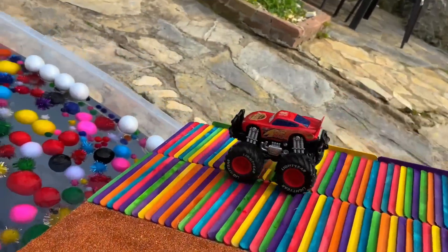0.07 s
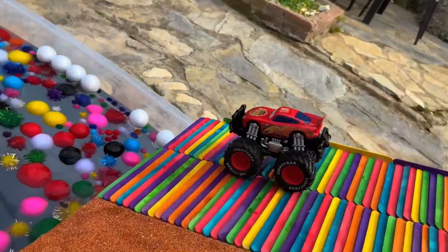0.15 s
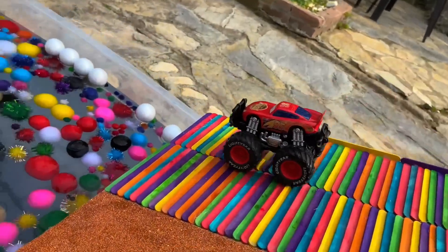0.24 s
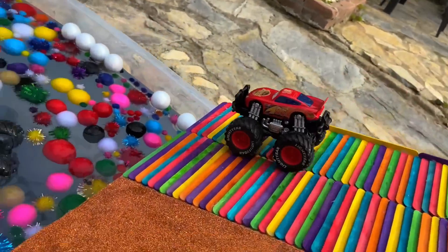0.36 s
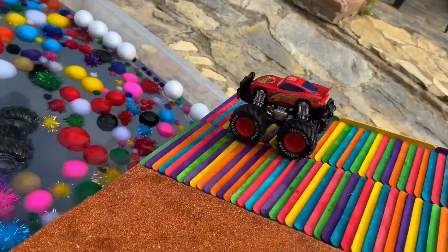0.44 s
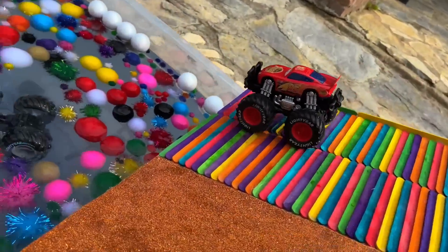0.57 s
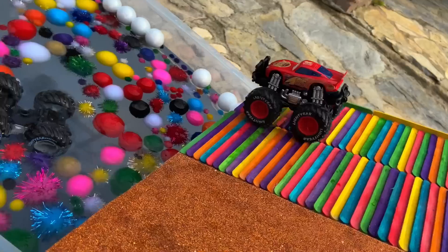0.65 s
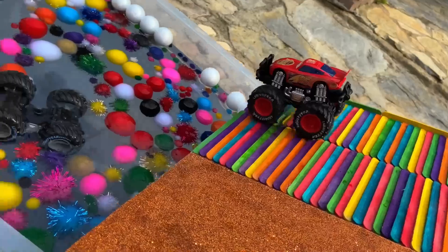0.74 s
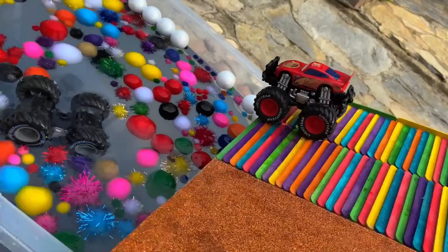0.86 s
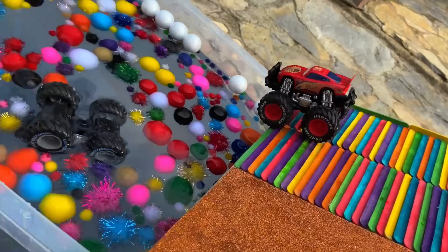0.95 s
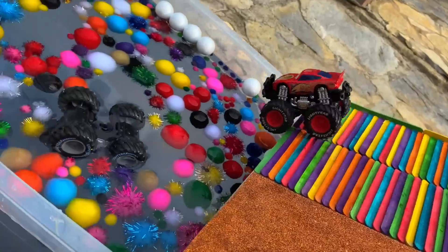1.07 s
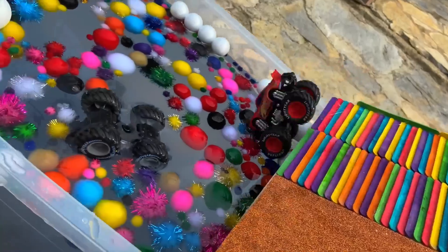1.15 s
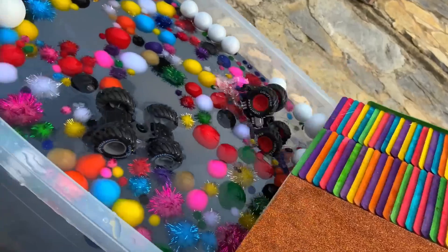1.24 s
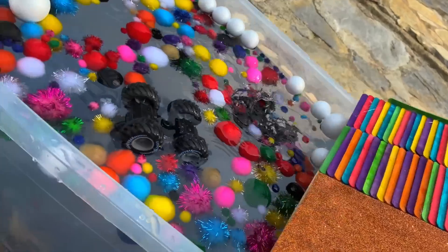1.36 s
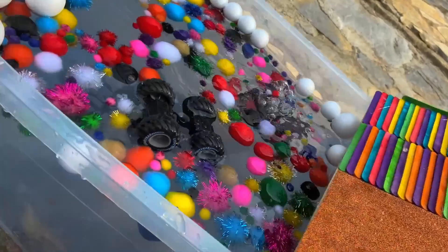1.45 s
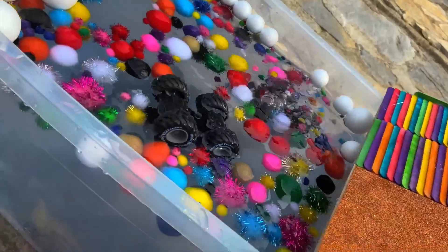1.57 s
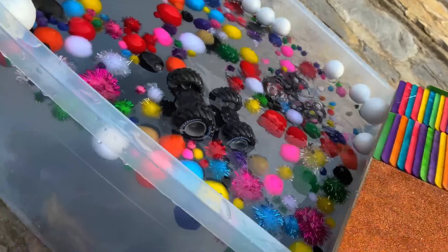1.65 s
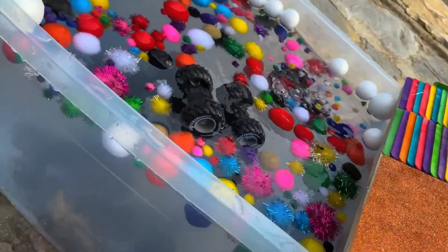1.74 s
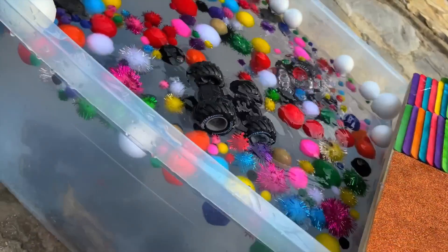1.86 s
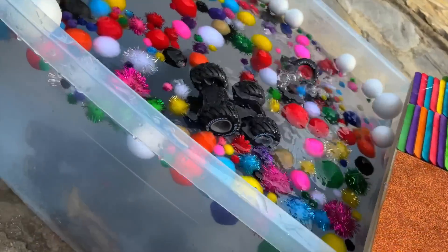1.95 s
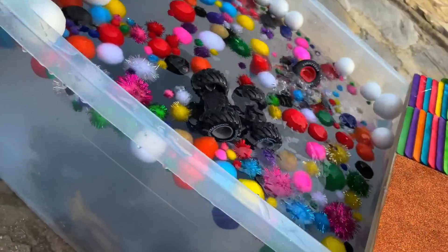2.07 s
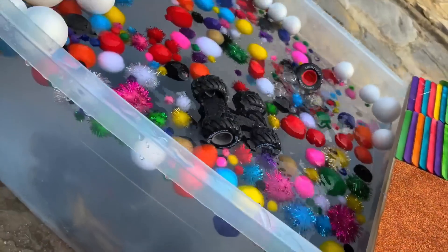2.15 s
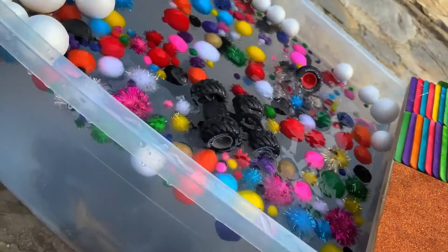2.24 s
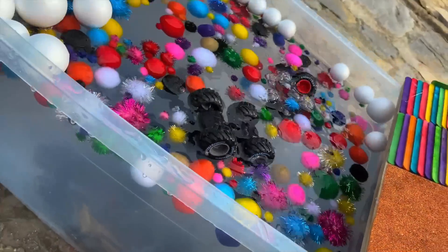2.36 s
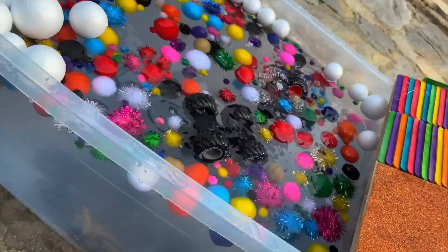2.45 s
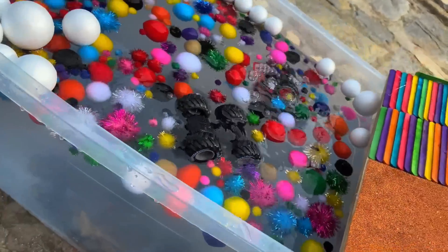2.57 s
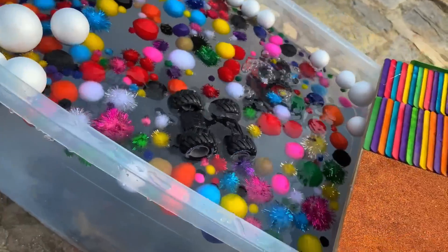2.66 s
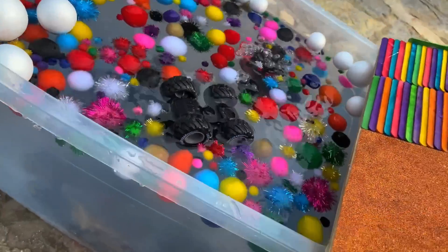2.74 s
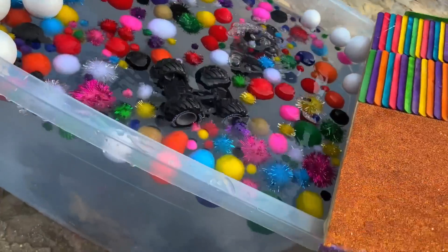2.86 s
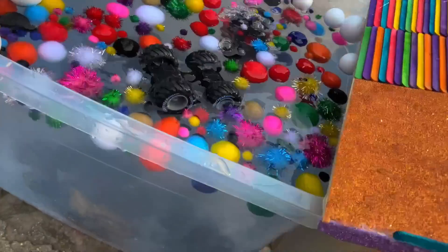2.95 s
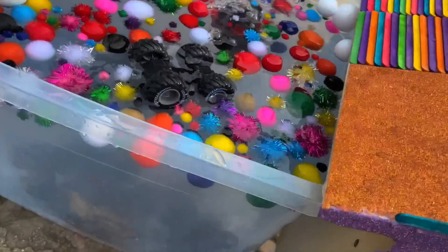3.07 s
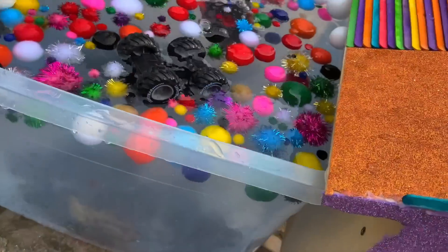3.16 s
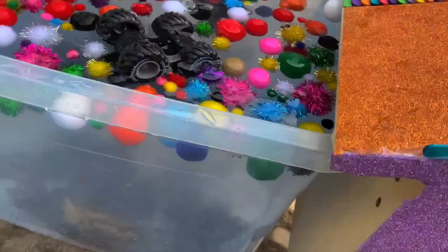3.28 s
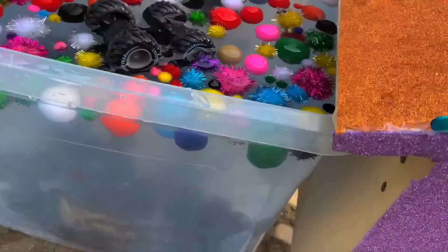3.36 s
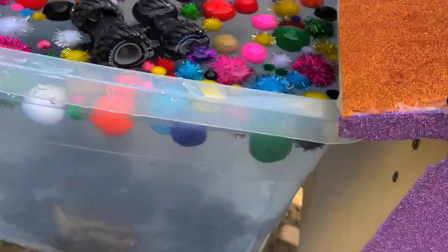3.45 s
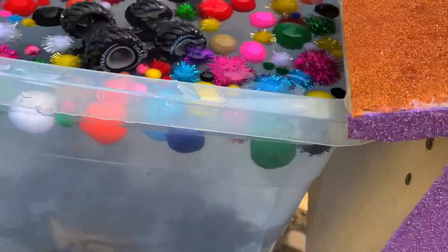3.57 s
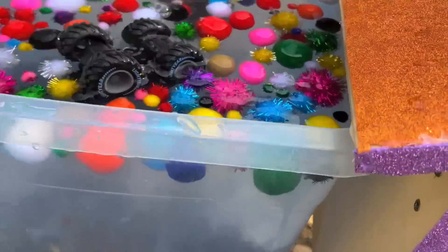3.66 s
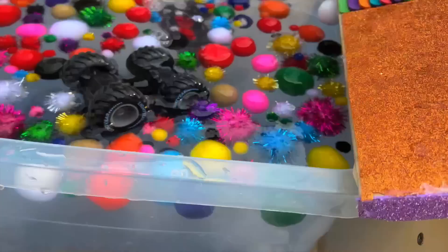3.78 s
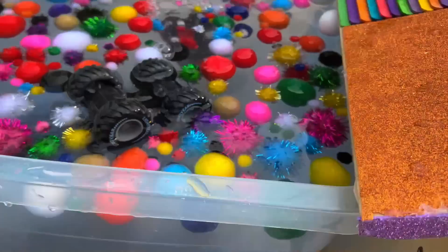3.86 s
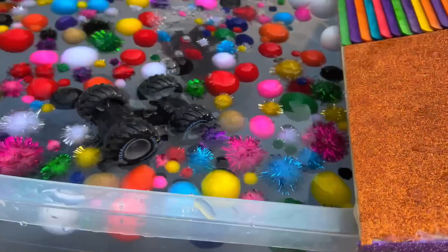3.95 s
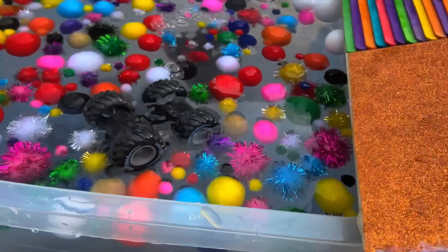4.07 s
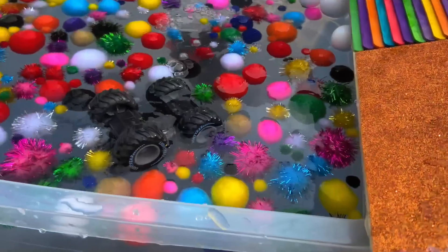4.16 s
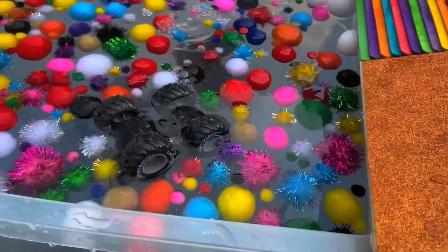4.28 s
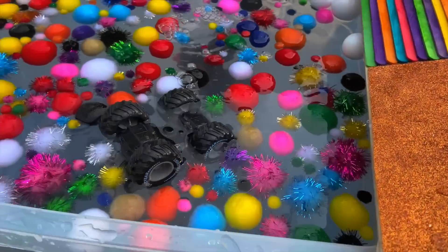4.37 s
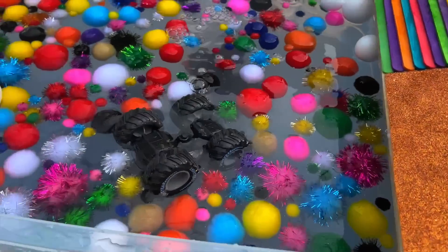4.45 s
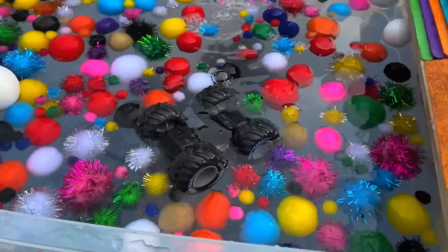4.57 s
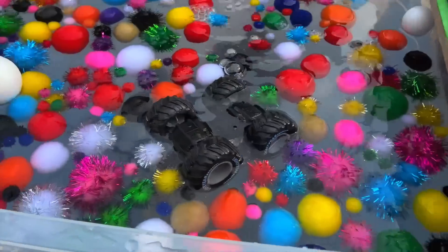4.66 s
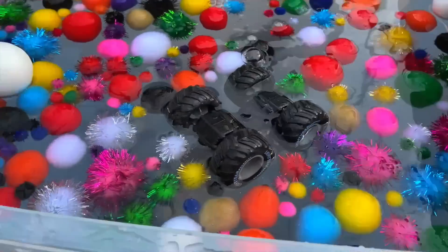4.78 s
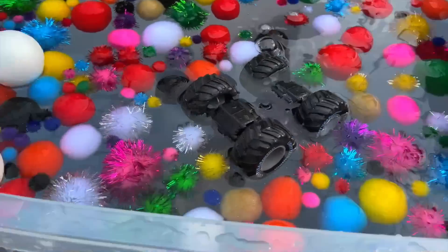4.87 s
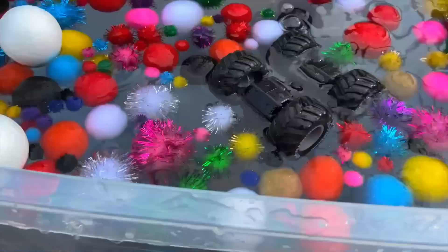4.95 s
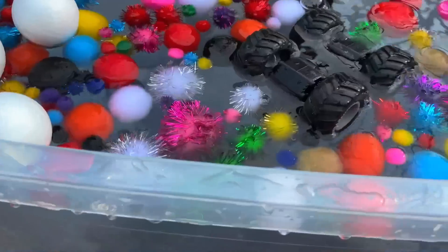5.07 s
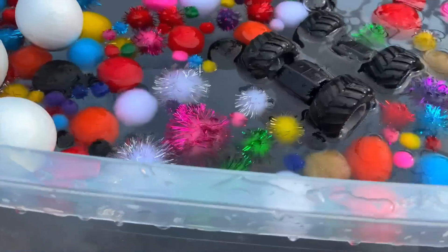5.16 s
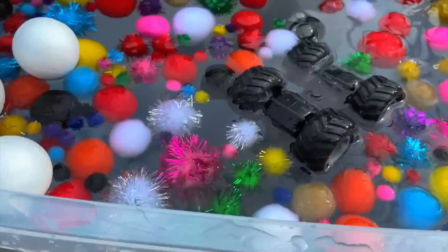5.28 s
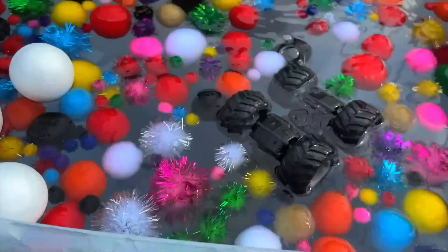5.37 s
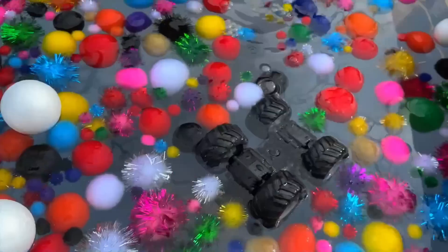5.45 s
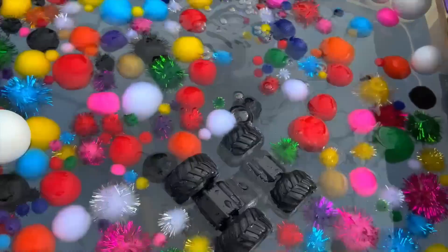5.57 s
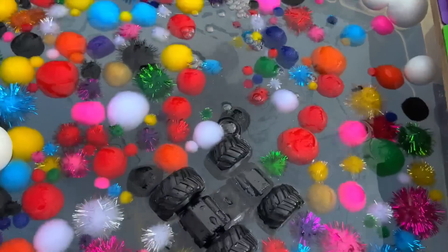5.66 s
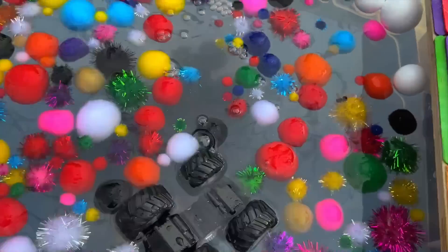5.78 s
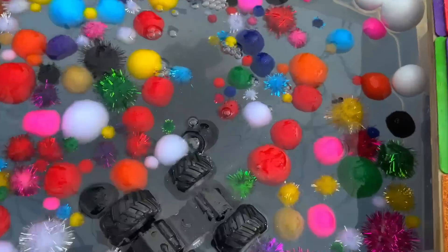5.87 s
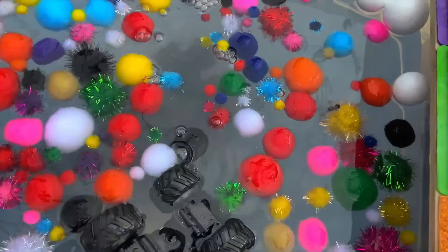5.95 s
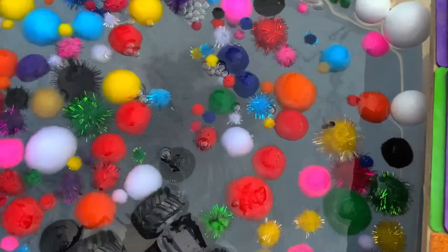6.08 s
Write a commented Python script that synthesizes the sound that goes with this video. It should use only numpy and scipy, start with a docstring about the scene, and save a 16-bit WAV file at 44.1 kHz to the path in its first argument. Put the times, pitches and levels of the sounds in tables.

```python
"""Toy truck, tub of water and hollow box

A toy truck rattles along a ribbed ramp: jolts excite resonances of the loose parts and the ramp.
It tips into a tub: gliding, decaying sines make the bubbles, shaped noise the thrown water and smacks.
Small bubbles keep rising; then soles shift on gritty paving, as filtered random impulses and noise.
The hollow box under the ramp, a sum of damped modes, is nudged, dragged and knocked.
Two ports of a hand-held phone listen close by, amid faint outdoor noise."""
import sys
import numpy as np
from scipy import signal
from scipy.fft import rfft, irfft, next_fast_len
from scipy.io import wavfile
from scipy.ndimage import uniform_filter1d

SR = 44100
rng = np.random.default_rng(int(sys.argv[2]) if len(sys.argv) > 2 else 0)


def output_pcm(signal):
    """Save a mono or channel-first signal as 16-bit PCM at the path in sys.argv[1].

    Samples are clipped to [-1, 1] before scaling.
    """
    pcm = np.clip(np.atleast_2d(signal).T, -1, 1) * 32767
    wavfile.write(sys.argv[1], SR, np.round(pcm).astype(np.int16))


N = 269892

# wheels on the ribs: [t/s, ramp bass level/dB, ramp boom level/dB, low rattle level/dB, high rattle level/dB]
ROLL = [(0.0, -43.5, -37.5, -49, -56), (0.038, -46.5, -57, -60, -62.5), (0.14, -72, -54.5, -60, -66.5),
        (0.176, -51, -60, -55.5, -56), (0.192, -57, -52, -71, -76), (0.21, -63, -56.5, -60, -63),
        (0.268, -55, -55.5, -57, -62), (0.446, -52.5, -57, -57.5, -59), (0.498, -50, -65, -61.5, -71),
        (0.522, -58, -58.5, -63, -62.5), (0.594, -56, -54.5, -59.5, -65.5), (0.7, -55, -55.5, -61, -61.5),
        (0.71, -50, -64, -70, -63), (0.75, -63, -63, -63, -63.5), (0.768, -71, -57, -72, -83),
        (0.784, -68, -57, -58, -54), (0.832, -54, -59, -65, -62), (0.916, -66, -64, -63.5, -60),
        (0.948, -59, -72, -59, -66), (0.982, -63, -48, -60.5, -58.5), (1.072, -64, -72, -62.5, -68.5),
        (1.1, -52, -63, -75, -88)]
# resonances of the ramp: [f/Hz, width/Hz, level/dB]
RAMP_MODES = [(127.4, 13.4, 0.5), (175, 15.4, 1.5), (246, 33, -8.5), (286, 20, -3.5), (356, 52, -31)]
# resonances of the truck's loose parts, lower and upper: [f/Hz, width/Hz, level/dB]
TRUCK_LOW_MODES = [(676, 135, -4.5), (1060, 91, -3.5), (1450, 140, -2.5), (1745, 51, -4)]
TRUCK_TOP_MODES = [(2120, 150, -2.5), (2620, 150, 1), (2980, 100, -7), (3330, 270, -1.5), (3780, 270, -3.5),
                   (4400, 260, -17), (6100, 2700, -15.5)]
# axle whirr, a narrow ring that shifts as the truck rolls: [t/s, f/Hz, level/dB]
WHIRR = [(0, 2920, -65), (.25, 2860, -71), (.36, 2830, -67), (.43, 2730, -65), (.55, 2860, -62.5),
         (.62, 2800, -67), (.69, 2780, -61), (.79, 2730, -64), (.84, 2650, -66), (.9, 2590, -67),
         (1.0, 2660, -57), (1.08, 2770, -65.5), (1.1, 2720, -77)]
# harder bumps that thump the ramp: [t/s, level/dB, f/Hz]
BUMPS = [(0.009, -36, 314), (0.112, -54, 139), (0.177, -45.5, 284), (0.277, -49, 129), (0.339, -52, 102),
         (0.382, -55, 164), (0.418, -53, 129), (0.448, -39, 137), (0.513, -47, 172), (0.569, -42, 103),
         (0.644, -47, 295), (0.68, -40.5, 170), (0.829, -42, 135), (0.972, -40.5, 154), (0.998, -43, 180),
         (1.04, -53, 153)]
# spectrum of the outdoor noise: [f/Hz, relative level/dB]
YARD = [(100, -1.5), (242, -4), (607, -4.5), (1070, -23), (1400, -14), (3000, -18), (7000, -22),
        (10000, -23), (13200, -20.5), (16000, -32.5)]
# deep outdoor bass: [t/s, level/dB]
YARD_BASS = [(0, -68), (.6, -55.5), (1.3, -59.5), (1.6, -66.5), (2.69, -68), (2.96, -62), (3.36, -66.5),
             (3.72, -58), (4.07, -69), (4.53, -69), (4.75, -55), (4.95, -61.5), (5.28, -50.5), (5.69, -62),
             (6.12, -59)]
# two faint narrow tones that waver in the distance: [f/Hz, width/Hz, level/dB]
DRONE = [(611.5, 36, -87), (1030, 43, -83)]
# large bubbles: [t/s, f/Hz, level/dB, t60/s, pitch rise over t60/octave]
GULPS = [(1.116, 780, -44, 0.023, 0), (1.120, 880, -23.5, 0.0094, -0.4), (1.126, 2600, -26.5, 0.0081, 0.13),
         (1.119, 290, -31.5, 0.026, 0.56), (1.1285, 137, -14, 0.034, -0.054),
         (1.127, 1440, -33, .015, -0.47), (1.144, 710, -36, .02, -0.15), (1.195, 1820, -29, .012, 0),
         (1.203, 1090, -40, 0.023, -0.56), (1.225, 555, -43, 0.042, .6), (1.281, 1520, -30.5, 0.034, 0.27),
         (1.282, 494, -31, .03, 0.094), (1.147, 189, -19.5, 0.032, -0.58), (1.154, 698, -35, 0.014, 0.26),
         (1.17, 159, -32, 0.058, -0.14), (1.195, 1450, -20.5, 0.019, 0.042),
         (1.206, 3760, -30.5, 0.014, -0.31), (1.2145, 905, -12.5, 0.0067, 0.33),
         (1.216, 4000, -23.5, 0.0098, 0.43), (1.278, 3180, -35.5, 0.029, 0.46),
         (1.277, 4550, -35, 0.019, -0.22), (1.219, 2590, -27, 0.022, 1.1), (1.240, 940, -31, 0.031, 0.24),
         (1.246, 2240, -29.5, 0.023, -0.15), (1.259, 990, -28, 0.016, -0.3),
         (1.278, 930, -22.5, 0.031, -0.12), (1.284, 940, -18, 0.014, -0.11),
         (1.290, 1775, -25, 0.022, 0.21), (1.303, 513, -28, 0.059, 0.46),
         (1.313, 2140, -27.5, 0.042, -0.089), (1.317, 930, -15.5, 0.014, 0.31),
         (1.322, 2070, -30, 0.028, 0.056), (1.316, 3560, -37, 0.024, 0.056),
         (1.330, 2550, -25, 0.0112, 0.012), (1.345, 2773, -28.5, 0.013, .1),
         (1.373, 3370, -45, 0.017, 0.29), (1.394, 3630, -36.5, 0.015, .1), (1.436, 4400, -44, 0.012, 0.12),
         (1.3449, 936, -19.5, 0.036, 0.26), (1.356, 1020, -39, 0.034, 0.96),
         (1.366, 528, -35.5, 0.081, 1.7), (1.434, 920, -39, 0.014, 0.62), (1.452, 295, -34, 0.058, -0.5),
         (1.471, 1400, -50, .025, 0.18), (1.480, 950, -44, .03, 0.55), (1.474, 210, -46.5, 0.1, -0.39),
         (1.358, 2154, -22, 0.03, 0.12), (1.361, 433, -37, 0.057, 0.66), (1.372, 2230, -57, 0.032, 0.99),
         (1.389, 331, -27, 0.064, 0.34), (1.396, 327, -16, 0.016, 0.29), (1.407, 306, -30, 0.072, 1.2),
         (1.418, 1415, -40, .04, 0.1), (1.424, 784, -20, 0.0069, 0.6), (1.428, 262, -35, 0.08, 0.57),
         (1.435, 2690, -42.5, 0.012, 0.11), (1.449, 866, -30, 0.051, 0.67), (1.472, 832, -28, 0.014, 0.8)]
# sheets of thrown water: [t/s, length/s, gurgle level/dB, fizz level/dB, spray level/dB,
# level change over the length/dB]
SLOSH = [(1.109, 0.056, -44, -49.5, -58, -12.5), (1.149, 0.057, -47, -38, -44, -15.5),
         (1.192, 0.024, -57, -45.5, -66, 8), (1.211, 0.041, -47, -38, -41, -2),
         (1.251, 0.026, -75, -53, -61, -14), (1.27, 0.074, -43.5, -40, -57.5, 2),
         (1.335, 0.053, -41.5, -65.5, -55, -6), (1.381, 0.033, -43.5, -47.5, -62, 6),
         (1.439, 0.069, -50.5, -73.5, -76, -17), (1.498, 0.13, -76, -72, -84, 3)]
# drops that smack the surface: [t/s, level/dB]
SMACKS = [(1.123, -39), (1.16, -19.5), (1.2156, -41), (1.2764, -46), (1.2907, -18.5), (1.3204, -35),
          (1.330, -30), (1.369, -42), (1.388, -29), (1.409, -36), (1.436, -42), (1.579, -57), (1.673, -39),
          (1.7294, -51)]
# small bubbles that surface afterwards: [t/s, level/dB, f/Hz, relative level of the follower/dB]
PLOPS = [(1.537, -57.5, 560, -21), (1.598, -61, 465, -12), (1.664, -69, 601, -11), (1.709, -54.5, 570, -20),
         (1.766, -45, 410, -5.5), (1.804, -53, 471, -10), (1.842, -52, 575, -11), (1.885, -60, 610, -8),
         (1.976, -54, 580, -15), (2.02, -51.5, 590, -5), (2.025, -52, 1450, -15), (2.045, -58, 590, -10),
         (2.083, -62, 504, -12), (2.112, -49.5, 630, -10.5), (2.139, -58, 800, -2), (2.173, -57, 460, -10),
         (2.199, -53, 600, -20), (2.233, -58, 463, -5), (2.25, -55, 680, -4), (2.262, -58, 547, -6),
         (2.292, -60.5, 590, 6), (2.321, -50.5, 630, -10.5), (2.347, -49, 570, -5), (2.372, -59, 710, -8),
         (2.377, -57, 1370, -14), (2.394, -59, 607, -3), (2.452, -52, 640, -5), (2.51, -60, 490, -11)]
# tiny bubbles that burst with a tick: [t/s, level/dB, f/Hz]
FLECKS = [(1.6374, -67, 5810), (1.6955, -62, 7260), (1.763, -59, 3270), (1.8754, -55, 13200),
          (1.9614, -57, 3070), (1.9844, -70, 3800), (2.0154, -62, 7160), (2.0208, -50, 4250),
          (2.0542, -57, 6740), (2.082, -45.5, 12200), (2.0953, -59, 6740), (2.1395, -63, 4260),
          (2.1635, -53, 7400), (2.3714, -49, 13200), (2.461, -51, 7300), (2.467, -54, 4170),
          (2.516, -54, 6940)]
# soles creeping over grit: [t/s, sand level/dB, dull rub level/dB]
CREEP = [(1.6, -80, -87), (2.33, -80, -71.5), (2.61, -71, -73.5), (2.83, -65, -66), (2.93, -61, -60.5),
         (2.99, -60, -55.5), (3.04, -71, -61), (3.07, -63.5, -66.5), (3.26, -67, -64), (3.51, -69.5, -71),
         (3.64, -62, -55), (3.76, -98, -101), (4.0, -55.5, -52.5), (4.22, -74.5, -87), (4.71, -67.5, -66),
         (5.02, -68.5, -61), (5.17, -63.5, -61), (5.23, -62, -51), (5.45, -87, -81), (5.515, -65, -65.5),
         (5.53, -67, -57), (5.57, -67, -67), (5.59, -67, -64), (5.67, -79, -76), (5.84, -77, -66.5),
         (6.12, -73, -74)]
# scuffs: [t/s, length/s, level/dB, sole tone f/Hz, relative tone level/dB, level change over the length/dB]
SCUFFS = [(2.821, 0.015, -62.5, 1680, 6, 9), (3.009, 0.014, -48.5, 1940, 8, 9),
          (3.011, 0.015, -66, 930, 8, 0), (3.023, 0.033, -69, 3300, 5, 0),
          (3.109, 0.012, -62.5, 930, 12, -1), (3.129, 0.025, -65, 1070, 4, 9),
          (3.812, 0.07, -67.5, 1290, 5.5, -11), (3.869, 0.1, -60.5, 965, 5.5, 7.5),
          (3.984, 0.028, -66, 4100, 14.5, 6), (4.048, 0.017, -70, 840, 23.5, -22),
          (4.487, 0.042, -58.5, 1010, 5.5, 4), (4.649, 0.034, -48, 2070, -0.5, -18),
          (4.674, 0.034, -47, 2040, -1, -6), (4.847, 0.043, -75.5, 810, 16, -7),
          (5.524, 0.048, -56.5, 1010, -12, 13), (5.768, 0.023, -48.5, 1870, 0, 0),
          (5.937, 0.1977, -80.5, 5600, 21, 23)]
# grains that crack under a sole: [t/s, level/dB, f/Hz, treble snap level/dB]
GRIT = [(2.6563, -51, 5370, -46), (2.975, -68, 6000, -59), (3.128, -62, 6000, -54), (3.142, -62, 6000, -54),
        (4.177, -44.5, 6500, -58), (4.29, -56, 4500, -68), (4.349, -57, 5000, -70), (5.484, -56, 7000, -49),
        (5.598, -48, 2100, -48), (5.726, -52, 2980, -70), (5.927, -57, 6000, -48), (6.0, -65, 7000, -62),
        (2.8837, -38, 4440, -26.5), (2.8978, -34.5, 4500, -40), (3.0147, -28, 2000, -38),
        (3.1087, -39.5, 3380, -60), (3.1327, -33.5, 2740, -63), (3.15, -53, 6000, -57),
        (3.214, -53, 4540, -53), (3.8214, -55, 3970, -59), (3.843, -44.5, 6700, -43),
        (3.9954, -36, 4130, -38.5), (4.039, -42, 3050, -44), (4.1671, -41.5, 7200, -43),
        (4.305, -43.5, 4570, -72), (4.6538, -30.5, 2100, -41), (4.68, -29, 2200, -49),
        (4.6984, -29.5, 2090, -58), (4.772, -47, 2200, -55), (4.966, -29.5, 3730, -28),
        (4.976, -46, 2240, -64), (5.02, -24.5, 1960, -37.5), (5.072, -32.5, 2000, -38),
        (5.197, -37, 2630, -33.5), (5.286, -39.5, 2110, -37), (5.3019, -40, 2070, -40.5),
        (5.454, -44.5, 2020, -44), (5.524, -39.5, 4640, -64), (5.7507, -54, 2080, -59),
        (5.7758, -40, 2230, -37), (5.856, -43, 3260, -78)]
# heel taps: [t/s, level/dB, f/Hz]
TAPS = [(2.777, -30.5, 746), (2.779, -39, 454), (2.782, -39.5, 236), (2.795, -40.5, 850), (2.805, -45, 153),
        (2.839, -42.5, 800), (2.943, -47, 800), (3.018, -33.5, 880), (3.112, -49, 170), (3.125, -47, 150),
        (3.137, -47, 1000), (3.148, -46, 1000), (3.152, -57, 160), (4.453, -36.5, 2060),
        (4.724, -47.5, 172), (5.595, -39.5, 1260), (5.8, -39.5, 850), (5.858, -35, 690)]
# modes of the hollow box: [f/Hz, level/dB]
BOX_MODES = [(102, -10.5), (161, -9.5), (194, -7), (226, -11), (303, -15), (401, -11.5), (518, -1),
             (592, 3.5), (641, 0), (896, -6), (1122, 1.5), (1236, 1), (1440, -10), (1763, 0), (1914, 4.5),
             (2210, -7), (2860, -31), (3610, -3.5)]
# where each box mode sits: [0 base, 1 belly, 2 side, 3 lid]
PANEL = [0, 0, 0, 0, 1, 1, 1, 1, 1, 1, 2, 2, 2, 2, 3, 3, 3, 3]
# knocks on the box: [t/s, level/dB, contact/ms, base level/dB, side level/dB, lid level/dB]
KNOCKS = [(5.0192, -13, 0.019, -1.8, -1.5, -3), (5.0733, -8, 0.94, -4.5, -6, 3),
          (5.092, -25, 0.48, -5, -8, 6), (5.121, -42, 0.22, -8, -17, -5), (5.160, -40.5, 0.035, -5, -1, -1),
          (5.197, -49, 0.036, 17, 6, 9), (5.21, -50, 0.055, 4, 3, 9), (5.219, -52, 0.05, 1, 2, 12),
          (5.228, -42, 0.049, 9, 8, 8), (5.239, -47, 0.037, 14, 6, 10.5),
          (5.244, -36, 0.053, -5, 6.5, 12.5), (5.262, -35, .05, 3, -3, -13),
          (5.275, -32.5, 0.2, -11, 6, -8), (5.287, -25.5, 0.089, -1, -0.5, -6), (5.297, -59, .05, 2, 3, 10),
          (5.304, -41, 0.072, 5, 0, 8), (5.313, -51, .05, 4, -7, -7), (5.335, -47, 0.053, 6, 4, -7),
          (5.349, -35.5, 0.14, -15, -1, 1), (5.363, -47, .06, 0, -6, -6), (5.385, -37.5, 0.38, 9, -5, -6),
          (5.393, -38, 0.83, -2, 2, -3), (5.439, -39, 0.081, -3, 6, -5), (5.456, -50, 0.069, -7, 7.5, 1)]
# drags of the box: [t/s, swell/s, hold/s, heave level/dB, scrape level/dB]
DRAGS = [(3.506, 0.037, 0.037, -45, -50), (3.566, 0.022, 0.041, -41.5, -47),
         (3.623, 0.0088, 0.018, -40.5, -58), (3.643, 0.0096, 0.012, -46, -69),
         (3.695, 0.0087, 0.046, -65, -80), (3.753, .01, 0.12, -66, -74), (5.028, 0.0086, 0.024, -39, -50),
         (5.071, 0.0062, 0.033, -42, -51), (5.178, 0.014, 0.13, -45.5, -59),
         (5.336, 0.03, 0.052, -59.5, -65.5), (5.43, .012, 0.031, -55, -65)]
# delay of each source at the left port, negative when it arrives there first: [delay/sample]
LAG = dict(truck=4, water=6.5, box=-7, shoes=6.33)
# phase that the left port adds: [f/Hz, phase/rad]
PORT = [(6200, 0), (7600, 1.8), (9000, 3.0), (9650, 3.3), (11000, 5.3), (11700, 6.1), (12400, 6.35),
        (13100, 6.8), (14500, 8.8), (15200, 9.3), (16000, 9.45)]
# response of both ports: [f/Hz, level/dB]
MIC = [(7000, 0), (8400, -3), (9400, -8), (10600, -3), (12000, 0), (14300, -2), (15200, -9), (16000, -16)]

RIBS_HZ, RIB_JITTER, RIB_SCATTER_DB = 32.8, 0.1, 3
JOLT_S, JOLT_SHARE = .009, .7
RATTLE_FLICKER_DB = 2.5  # each loose part comes and goes on its own
RATTLE_TREBLE_DB = -19
RATTLE_WIDE = 0.77  # rattle of opposite sign at the ports, relative to the rattle common to both
WHIRR_WIDTH_HZ = 105
RAMP_BASS_HZ, RAMP_BASS_WIDTH_HZ = 69.5, 18
BUMP_CYCLES = 11.9  # cycles in t60
YARD_DB = -67.5
SWELL_CYCLES, GULP_WOBBLE_DB = 1.2, 1.5
GULP_PAN_DB, GULP_PAN_SPREAD_DB = -5.5, 2.5
# lesser bubbles of the plunge: time range, pitch range, mean level, decay and pitch rise
FROTH_S, FROTH_HZ, FROTH_DB, FROTH_T60_S = (1.2, 1.4), (351, 3360), -42.5, 0.024
FROTH_RISE_OCT, FROTH_COUNT = 0.41, 70
SURGE_DB, FIZZ_Q = 2.5, 2.2  # flicker of the thrown water; sharpness of its fizz
SMACK_BODY_DB, SMACK_PAN_SPREAD_DB = -25, 2.5
PLOP_UPPER, PLOP_PAN_DB = 1.63, -7.5  # pitch ratio of the smaller following bubble
FLECK_COUNT, FLECK_FLOOR_DB = 25, -64
TICK_RISE_S = 0.00013
TUB_WALL_MS, TUB_WALL_DB = 1.7, -40
CREEP_HISS_DB = -4.5  # relative to the sand
SOLE_HZ, SOLE_WIDTH_HZ, SOLE_DB = 820, 108, -9
SCUFF_TREBLE_DB, TAP_CYCLES = -2.5, 5.7
SHOE_PAN_DB, GRAIN_PAN_SPREAD_DB = -0.6, 3.5
BOX_CYCLES, BOX_LEAK = 36, 6  # a mode dies by 60 dB in 1 / (f / cycles + leak) s
KNOCK_SPOT_DB, KNOCK_DETUNE = 2, .03  # each blow lands elsewhere and the box sits differently
SLIPS_HZ, SLIP_JITTER, SLIP_SCATTER_DB = 97, .15, 2  # the edge sticks and lets go
HEAVE_GRIND = 0.35  # random grinding added to the more even slips
HEAVE_DAMP_S, SCRAPE_DAMP_S = 0.025, 0.0062  # the stone damps the box while it slides
SCRAPE_GRIT_DB = -17
DRAG_SWELL_DB, HEAVE_FADE_DB_PER_S, SCRAPE_FADE_DB_PER_S = 29.5, 276, 517
LAG_TOP_HZ = 4440  # around and above this the lag gives way to the ports' own phase
ECHO_DB, ECHO_T60_S, ECHO_HZ = -10, 0.11, (1160, 7200)
TOP_HZ = 16300
OPPOSITE = np.array([[1], [-1]])  # signs at the left and right port


def undb(db):
    """Logarithmic level: 20 dB is a factor of ten in amplitude."""
    return 10 ** (np.asarray(db) / 20)


def unit(x):
    """Normalisation to unit root-mean-square amplitude."""
    return x / np.sqrt(np.mean(x ** 2))


def curve(rows):
    """Linear interpolation of table columns along time, with a gate open over the table's span."""
    s, *columns = np.transpose(rows)
    t = np.arange(N) / SR
    gate = uniform_filter1d(1. * ((t >= s[0]) & (t <= s[-1])), size=400)
    return gate, *(np.interp(t, s, c) for c in columns)


def band(x, lo_hz, hi_hz):
    """Band-pass filtering: a Butterworth response selects a range of frequencies."""
    sos = signal.butter(2, [lo_hz, min(hi_hz, .45 * SR)], "band", fs=SR, output="sos")
    return signal.sosfilt(sos, x)


def ring(x, hz, width):
    """Resonance: a single damped mode with gain 1 at its centre."""
    return signal.lfilter(*signal.iirpeak(hz, hz / width, SR), x)


def clicks(rate, spread_db):
    """Shot noise: random impulses, on average rate per second, a few much larger than the rest."""
    hit, size, sign = rng.random(N), rng.exponential(size=N), rng.standard_normal(N)
    return (hit < rate / SR) * undb(spread_db * size) * np.sign(sign) / np.sqrt(rate / SR)


def walk(rate):
    """Low-pass random modulation: twice-smoothed random steps with spread near 1."""
    k = int(SR / rate)
    steps = np.repeat(rng.standard_normal(N // k + 1), k)
    return 1.29 * uniform_filter1d(uniform_filter1d(steps, k), k)[:N]


def place(x, pan_db):
    """Interaural level difference: pan_db is the left level minus the right."""
    return x * undb(np.array([[pan_db], [-pan_db]]) / 2)


def add(out, s, x, pan_db):
    """Superposition: a panned event adds to the sound present from time s."""
    i = int(s * SR)
    out[:, i:i + len(x)] += place(x, pan_db)[:, :max(N - i, 0)]


def bubble(hz, db, t60, rise, swell_cycles, wobble_db):
    """Damped oscillation: a sine swells and dies while its pitch may glide and its level wobble."""
    t = np.arange(int(abs(t60) * SR)) / SR
    phase = 2 * np.pi * np.cumsum(hz * 2 ** (rise * t / t60)) / SR
    shake = np.interp(t * hz / 3, np.arange(40), rng.standard_normal(40))  # a new value every 3 cycles
    decay = undb(db - 60 * (t / t60) ** 1.16 + wobble_db * shake)
    swell = 1 - np.exp(-t * hz / swell_cycles)
    return decay * swell * np.sin(phase)


def tick(db, lo_hz, hi_hz, t60):
    """Transient noise: a very short, band-limited crack whose peak is db."""
    t = np.arange(700) / SR
    envelope = (1 - np.exp(-t / TICK_RISE_S)) * undb(-60 * t / t60)
    x = band(rng.standard_normal(len(t)) * envelope, lo_hz, hi_hz)
    return undb(db) * x / np.abs(x).max()


def first_second_unit(x):
    """Normalisation by the spread over the first second, while the truck rolls."""
    return x / x[:SR].std()


def rib_jolts():
    """Quasi-periodic excitation: each rib jolts the wheels and the jolt relaxes exponentially."""
    chance = rng.standard_normal((80, 2)).T
    times = np.cumsum(np.exp(RIB_JITTER * chance[0])) / RIBS_HZ
    ribs = np.zeros(N)
    ribs[(times * SR).astype(int)] = undb(RIB_SCATTER_DB * chance[1])
    relaxing = signal.lfilter([1], [1, -np.exp(-1 / (JOLT_S * SR))], ribs)
    return 1 - JOLT_SHARE + JOLT_SHARE * first_second_unit(relaxing)


def truck():
    """Forced resonance: rib jolts make loose parts rattle, an axle whirr and the ramp boom."""
    gate, bass_db, boom_db, low_db, top_db = curve(ROLL)
    jolt = rib_jolts()
    rattle = clicks(2600., 1.5)

    def part():
        """Partly shared excitation: common clicks plus a loose part's own."""
        return jolt * (0.59 * rattle + clicks(1500., 2.5))

    def parts(modes):
        """Modal sum: each resonance has its own excitation and flicker."""
        return first_second_unit(sum(undb(g + RATTLE_FLICKER_DB * walk(29.96)) * ring(part(), hz, w)
                                     for hz, w, g in modes))

    def wide(modes):
        """Decorrelation: a common rattle plus one of opposite sign at the ports."""
        return parts(modes) + RATTLE_WIDE * parts(modes) * OPPOSITE

    low = band(wide(TRUCK_LOW_MODES), 410, 1760)
    treble = first_second_unit(band(jolt * rattle, 12000, 16000))
    top = band(wide(TRUCK_TOP_MODES), 1500, 8500) + undb(RATTLE_TREBLE_DB) * treble
    # shift the whirr's pitch to zero, low-pass, then shift back: a resonance that moves
    _, hz, whirr_db = curve(WHIRR)
    turn = np.exp(2j * np.pi * np.cumsum(hz) / SR)
    slow = signal.butter(1, WHIRR_WIDTH_HZ / 2, fs=SR)
    whirr = first_second_unit((turn * signal.lfilter(*slow, part() / turn)).real)
    boom = first_second_unit(sum(undb(g) * ring(jolt * clicks(600., 1.9), hz, w) for hz, w, g in RAMP_MODES))
    bass = first_second_unit(ring(clicks(600., 2.1), RAMP_BASS_HZ, RAMP_BASS_WIDTH_HZ))
    out = undb(bass_db) * bass + undb(boom_db) * boom
    out = out + undb(low_db) * low + undb(top_db) * top + undb(whirr_db) * whirr
    out = gate * out
    for s, level_db, hz in BUMPS:
        add(out, s, bubble(hz, level_db, BUMP_CYCLES / hz, 0, 0.54, 1.5), 0)
    return place(out, -4.5)


def yard():
    """Diffuse field: flickering half-octave noise bands, bass more alike at both ports, faint tones."""
    out, (hzs, dbs) = 0, np.transpose(YARD)
    for hz in 120 * 2 ** np.arange(0, 7.1, .5):
        mid, side = (ring(rng.standard_normal(N), hz, hz / 3.2) for _ in range(2))
        db = np.interp(np.log(hz), np.log(hzs), dbs) + 0.5 * walk(8.5)
        out = out + undb(db) * (mid + min(hz / 400.0, .8, 4000 / hz) * side * OPPOSITE)
    mid, side = (unit(band(rng.standard_normal(N), 2.9, 90.0)) for _ in range(2))
    bass = undb(curve(YARD_BASS)[1]) * (mid + 0.39 * side * OPPOSITE)
    drone = 0
    for hz, width, db in DRONE:
        tone = unit(ring(ring(rng.standard_normal(N), hz, width), hz, width))
        drone = drone + undb(db + 4.6 * walk(3.84)) * tone
    return undb(YARD_DB) * unit(out) + bass + drone


def thrown_water():
    """Filtered shot noise: random impulses ring as gurgle and fizz, or pass a high band as spray."""
    gurgle = sum(ring(clicks(200., 3.4), hz, hz / 5.1) for hz in np.geomspace(300, 1200, num=7))
    fizz = sum(ring(clicks(430.0, 4.9), hz, hz / FIZZ_Q) for hz in np.geomspace(1400, 6500, num=12))
    spray = band(clicks(3100.0, 3.92), 7800, 14600)
    gain = np.zeros((3, N))
    for s, length, *dbs, fade_db in SLOSH:
        i, n = int(s * SR), int(length * SR)
        envelope = signal.windows.tukey(n, .35) * undb(np.linspace(0, fade_db, n))
        gain[:, i:i + n] += np.outer(undb(dbs), envelope)
    surge = undb(SURGE_DB * walk(120))
    return place(surge * (gain * [unit(gurgle), unit(fizz), unit(spray)]).sum(axis=0), -4.5)


def water():
    """Bubble oscillation and surface impact: gulps, sloshes and smacks, then small bubbles."""
    out = thrown_water()
    froth = []
    for a, b, c in rng.random((FROTH_COUNT, 3)):
        hz = FROTH_HZ[0] * (FROTH_HZ[1] / FROTH_HZ[0]) ** b
        level_db = FROTH_DB + 8 * (c - .5)
        froth.append((np.interp(a, [0, 1], FROTH_S), hz, level_db, FROTH_T60_S, FROTH_RISE_OCT))
    for s, hz, level_db, t60, rise in GULPS + froth:
        pan_db = GULP_PAN_DB + GULP_PAN_SPREAD_DB * rng.standard_normal()
        add(out, s, bubble(hz, level_db, t60, rise, SWELL_CYCLES, GULP_WOBBLE_DB), pan_db)
    for s, peak_db in SMACKS:
        smack = tick(peak_db, 5900, 21400, 0.015) + tick(peak_db + SMACK_BODY_DB, 3500, 8500, 0.0094)
        add(out, s, smack, SMACK_PAN_SPREAD_DB * rng.standard_normal())
    for s, level_db, hz, upper_db in PLOPS:
        add(out, s, bubble(hz, level_db, 11 / hz, 0.31, 0.1, 0.8), PLOP_PAN_DB)
        upper_hz = hz * PLOP_UPPER
        add(out, s + 0.0022, bubble(upper_hz, level_db + upper_db, 14 / hz, 0.24, 0.26, 0.65), PLOP_PAN_DB)
    # lesser flecks fall at random within one second
    lesser = [(1.5 + a, FLECK_FLOOR_DB + 8 * b, 3000 * 4 ** c) for a, b, c in rng.random((FLECK_COUNT, 3))]
    for s, level_db, hz in FLECKS + lesser:
        burst = tick(level_db - 1, 2500, 18000, 0.0025)[:int(30 / hz * SR)]
        add(out, s, bubble(hz, level_db, 30 / hz, 0.12, 0.5, 0) + burst, 0)
    # the far wall of the tub throws the water's sound back to the left port
    out[0] += undb(TUB_WALL_DB) * np.roll(out[1], int(TUB_WALL_MS * SR / 1000))
    return out


def creep():
    """Granular friction: random grain impulses pass bands of sand, dull rub and hiss and ring the sole."""
    gate, db, dull_db = curve(CREEP)
    grains = clicks(3500., 2.3) * undb(2.5 * walk(40))
    sand = unit(band(grains, 1470, 10800))
    rub = unit(band(grains, 307, 3060)) + undb(SOLE_DB) * unit(ring(grains, SOLE_HZ, SOLE_WIDTH_HZ))
    hiss = unit(band(grains, 9800, 14800))
    return place(gate * (undb(db) * sand + undb(dull_db) * rub + undb(db + CREEP_HISS_DB) * hiss), -0.081)


def scuff(length, hz, tone_db, fade_db):
    """Sliding friction: enveloped rough noise is coloured by the sole's bands and its tone."""
    t = np.arange(int(length * SR)) / SR
    rub = rng.standard_normal(len(t)) * undb(0.79 * rng.exponential(size=len(t)))
    rub = rub * signal.windows.tukey(len(t), .4) * undb(fade_db * t / length)
    sole = unit(band(rub, 1400, 5080)) + undb(SCUFF_TREBLE_DB) * unit(band(rub, 3960, 10600))
    sole = sole + undb(tone_db) * unit(ring(rub, hz, hz * .5))
    return sole + undb(-2.0) * unit(band(rub, 280, 1600))  # the shoe's own dull body


def shoes():
    """Friction, fracture and impact: soles creep and scuff, crack single grains and tap."""
    out = creep()
    for s, length, level_db, hz, tone_db, fade_db in SCUFFS:
        add(out, s, undb(level_db) * scuff(length, hz, tone_db, fade_db), SHOE_PAN_DB)
    for s, peak_db, hz, top_db in GRIT:
        pan_db = SHOE_PAN_DB + GRAIN_PAN_SPREAD_DB * rng.standard_normal()
        crack = tick(peak_db, hz * 0.5, hz * 1.54, 0.01)
        add(out, s, crack + tick(top_db, 6900, 13700, 0.0097), pan_db)
    for s, level_db, hz in TAPS:
        add(out, s, bubble(hz, level_db, TAP_CYCLES / hz, 0, 0.011, 0), SHOE_PAN_DB)
    return out


def box_modes(tune):
    """Modal decomposition: the hollow body's impulse response as damped sines, one row per mode."""
    t = np.arange(SR // 2) / SR
    return np.array([(-1) ** k * undb(db - 60 * t * (hz / BOX_CYCLES + BOX_LEAK))
                     * np.sin(2 * np.pi * hz * tune[k] * t) for k, (hz, db) in enumerate(BOX_MODES)])


def drags(modes):
    """Stick-slip friction: irregular slips and grinding make the whole box heave and its edge scrape."""
    t = np.arange(modes.shape[1]) / SR
    chance = rng.standard_normal((900, 2)).T
    at = (np.cumsum(np.exp(SLIP_JITTER * chance[0])) / SLIPS_HZ * SR).astype(int)
    slips = np.zeros(N)
    slips[at[at < N]] = undb(SLIP_SCATTER_DB * chance[1][at < N])
    judder = unit(slips) + HEAVE_GRIND * clicks(4000., 1.0)
    strokes = 0.6 + unit(signal.lfilter([1], [1, -np.exp(-1 / (.002 * SR))], slips))
    heave = signal.fftconvolve(judder, modes.sum(axis=0) * np.exp(-t / HEAVE_DAMP_S))[:N]
    heave = unit(band(heave, 107, 300))
    # the edge touches the stone at many points, so each mode has its own clicks
    scrape = sum(signal.fftconvolve(strokes * clicks(1500., 2.3), mode * np.exp(-t / SCRAPE_DAMP_S))[:N]
                 for mode in modes)
    grit = unit(band(strokes * clicks(2800.0, 1.0), 2900, 4600))
    scrape = unit(band(scrape, 450, 1640)) + undb(SCRAPE_GRIT_DB) * grit
    out = np.zeros(N)
    for s, swell, hold, heave_db, scrape_db in DRAGS:
        late = np.arange(N) / SR - s
        push = (late > 0) * undb(DRAG_SWELL_DB * np.minimum(late / swell - 1, 0))
        after = np.maximum(late - swell - hold, 0)
        heave_gain = undb(heave_db - HEAVE_FADE_DB_PER_S * after)
        scrape_gain = undb(scrape_db - SCRAPE_FADE_DB_PER_S * after)
        out += push * (heave_gain * heave + scrape_gain * scrape)
    return out


def knocks(modes):
    """Impact excitation: a longer contact pulse rounds the blow and weakens the upper modes."""
    top = np.abs(modes.sum(axis=0)).max()
    t = np.arange(SR // 100) / SR
    out = np.zeros((2, N))
    spots = rng.uniform(-1, 1, (len(KNOCKS), len(BOX_MODES)))
    for (s, db, contact_ms, base_db, side_db, lid_db), spot in zip(KNOCKS, spots):
        push = t * np.exp(-t * 1000 / np.clip(contact_ms / 2, .01, 2))
        push = undb(db) * push / push.sum()
        weights = undb(np.array([base_db, 0, side_db, lid_db])[PANEL] + KNOCK_SPOT_DB * spot)
        body = weights @ box_modes(1 + KNOCK_DETUNE * spot[::-1]) / top
        add(out, s, signal.fftconvolve(push, body), 0)
    return out[0]


def box():
    """Shared modal response: stick-slip pushes and blows ring the same hollow body."""
    modes = box_modes(np.ones(len(BOX_MODES)))
    return place(band(drags(modes) + knocks(modes), 60, 8700), -0.5)


def shape(x, gain):
    """Frequency response: each spectral component is weighted and turned in phase."""
    return irfft(rfft(x, next_fast_len(N)) * gain, next_fast_len(N))[:N]


def scatter(near):
    """Diffuse reflection: paving, tub walls and fence scatter a short tail, different at each port."""
    t = np.arange(SR // 5) / SR
    tail = rng.standard_normal((2, len(t))) * undb(-60 * t / ECHO_T60_S) * (t > .002)
    tail = band(tail, *ECHO_HZ)
    tail = undb(ECHO_DB) * tail / np.sqrt(np.sum(tail ** 2, axis=1)[:, None])
    return signal.fftconvolve(near.mean(axis=0, keepdims=True), tail, axes=1)[:, :N]


def scene():
    """Superposition: sources reach the left port with their own lags, then join echo and outdoor noise."""
    turn = 2 * np.pi * np.fft.rfftfreq(next_fast_len(N))  # radians per sample
    reach = np.exp(-(turn * SR / (2 * np.pi * LAG_TOP_HZ)) ** 2)
    sources = dict(truck=truck(), water=water(), shoes=shoes(), box=box())
    near = 0
    for name, (left, right) in sources.items():
        near = near + np.array([shape(left, np.exp(-1j * turn * LAG[name] * reach)), right])
    return near + scatter(near) + yard()


def record(dry):
    """Transfer function: the left port turns treble phase; both dip near 9 kHz and cut bass and top."""
    hz = np.fft.rfftfreq(next_fast_len(N), 1 / SR)
    mic_hz, mic_db = np.transpose(MIC)
    colour = undb(np.interp(np.log(hz + 1), np.log(mic_hz), mic_db))
    left = colour * np.exp(1j * np.interp(hz, *np.transpose(PORT)))
    both = np.array([shape(dry[0], left), shape(dry[1], colour)])
    both = signal.sosfilt(signal.butter(3, 45, "high", fs=SR, output="sos"), both)
    return signal.sosfilt(signal.ellip(10, .2, 80, TOP_HZ, fs=SR, output="sos"), both)


dry = scene()
out = record(dry)
output_pcm(out)
```